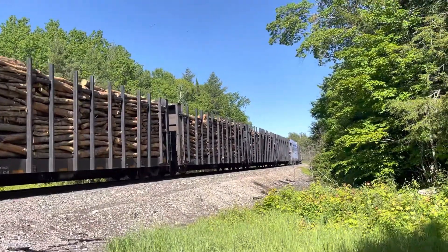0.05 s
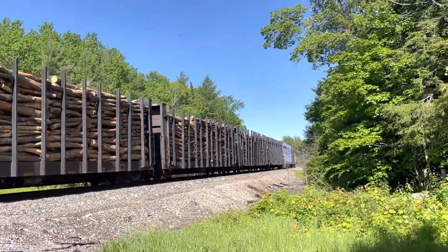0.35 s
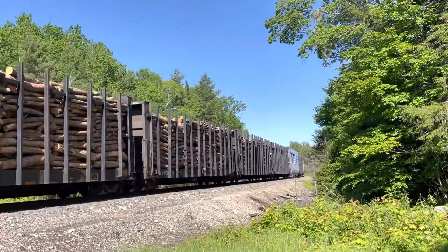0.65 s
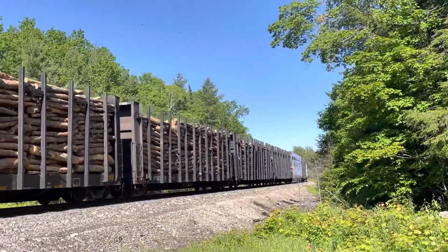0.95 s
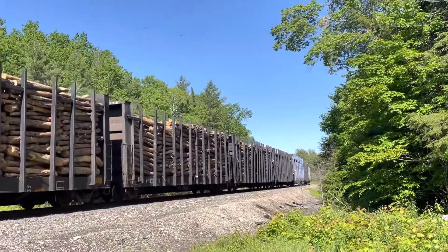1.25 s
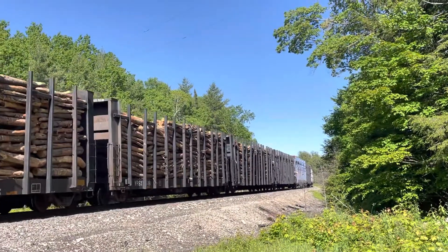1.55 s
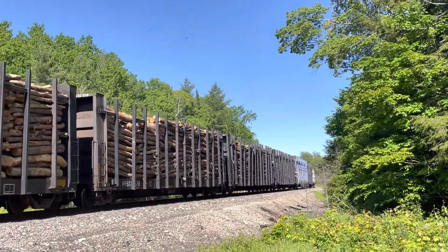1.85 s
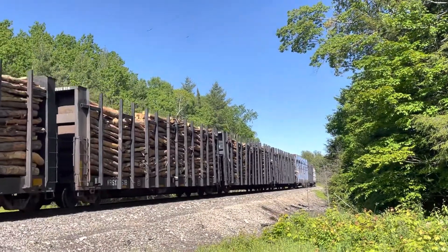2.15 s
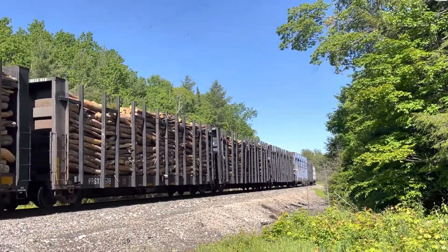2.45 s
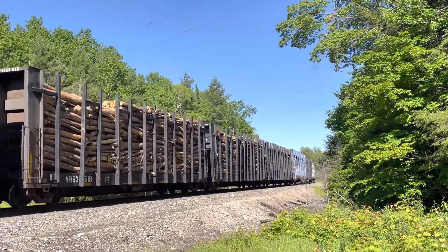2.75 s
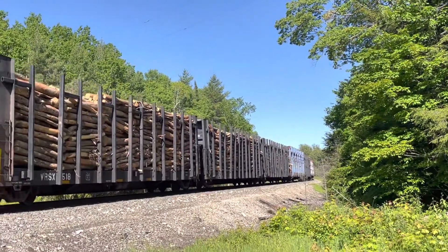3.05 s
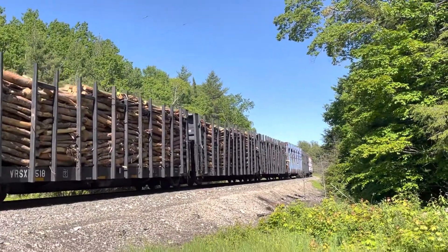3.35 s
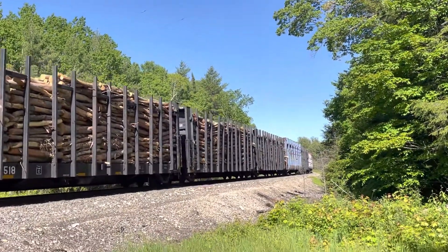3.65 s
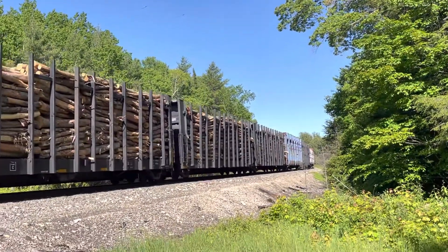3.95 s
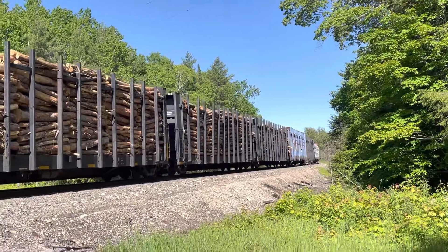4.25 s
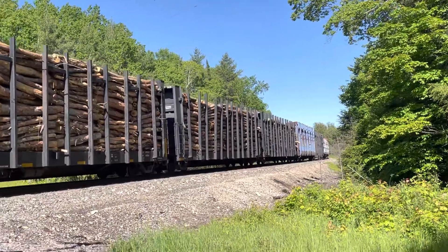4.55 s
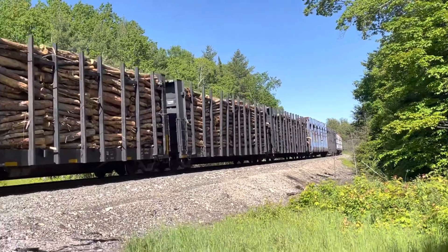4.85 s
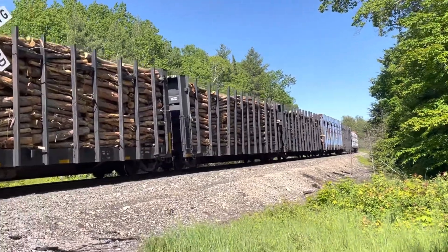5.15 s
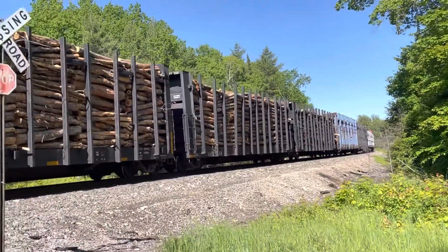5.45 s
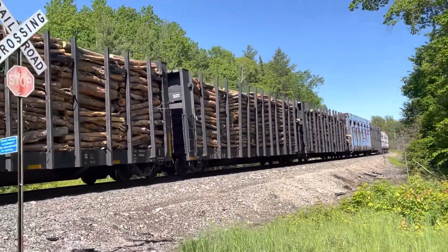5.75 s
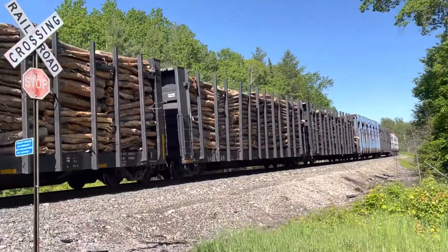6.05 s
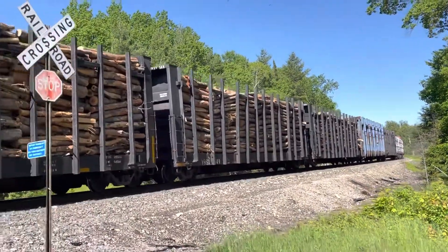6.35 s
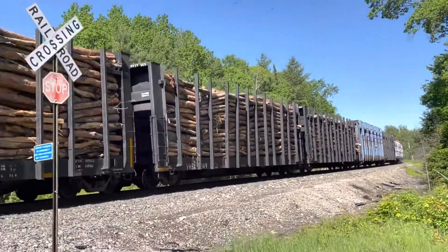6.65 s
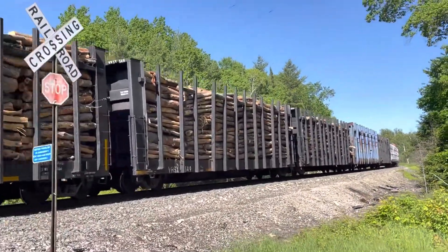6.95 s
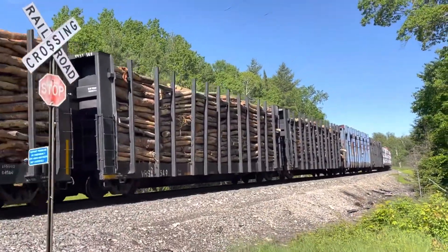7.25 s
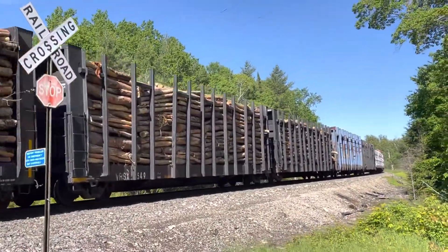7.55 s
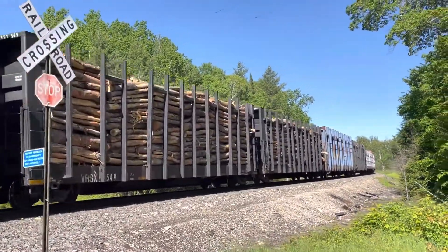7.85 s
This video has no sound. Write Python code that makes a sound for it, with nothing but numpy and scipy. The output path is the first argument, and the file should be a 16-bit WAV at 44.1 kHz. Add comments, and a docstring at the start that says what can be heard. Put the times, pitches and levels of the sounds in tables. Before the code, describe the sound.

A freight train of loaded log cars rolls slowly past, heard in stereo from beside the track. Throughout, a diesel engine throbs under a thin, faint whistle, while wheels rumble and hiss on the rails, gradually growing louder. Two dull knocks come in the first second. Light wheel scrapes and brief high squeals follow from about 0.5 to 3 seconds. Ringing steel clanks sound at about 3.3, 5 and 6 seconds, the middle one strongest and joined by grinding and squealing. From 3.7 seconds the loads knock and rattle more often, and the rolling swells as wheel sets pass at roughly 3.7, 4.9 and 6.6 seconds. Around 6.7 to 7.1 seconds the car bodies boom with a cluster of heavy knocks. From 7.3 seconds to the end, near 8 seconds, the wheels grind and squeal at their closest and loudest.

```python
"""Beside the track at an embankment, a stereo microphone hears loaded log cars roll slowly past.
From the start a diesel throbs under its turbocharger's thin whistle, and rough treads rumble on the rail.
Flanges grind in bursts, wheels sing briefly, loads knock and rattle. From about three seconds the slack
clanks through the cars and trucks swell by; near the end the bodies boom and the wheels grind closest."""
import sys
import numpy as np
from scipy import signal
from scipy.fft import irfft
from scipy.io import wavfile
from scipy.ndimage import uniform_filter1d

SR = 44100
rng = np.random.default_rng(int(sys.argv[2]) if len(sys.argv) > 2 else 0)


def put_to_file(sound):
    """Save the sound as 16-bit audio at rate SR, in the file named by the first command-line argument."""
    columns = np.atleast_2d(sound).T  # one column per channel
    safe = np.clip(columns, -1, 1)
    whole_steps = np.round(safe * 32767)
    wavfile.write(sys.argv[1], SR, whole_steps.astype(np.int16))


N = 352359
TIME = np.arange(N) / SR

# Speed of the diesel. Each row: time in seconds, firings per second.
FIRING_RATE = [(0, 42.8), (0.95, 42.85), (3.0, 45.7), (3.8, 46.37), (4.6, 46.37), (6.0, 45.7), (8.0, 45.75)]
# Roar of wheels and sleepers. Each row: frequency in Hz, spectral level in dB.
ROAR_TONE = [(120, -22.5), (280, -6), (420, 1), (530, -2.5), (650, -1.5), (850, -7.5), (1000, -10),
             (1300, -16), (1900, -29.5), (4000, -51), (9000, -79)]
# Phase between left and right. Each row: frequency in Hz, radians by which the left side leads.
LEFT_LEAD = [(80, .08), (300, .6), (500, 1.2), (680, 2), (950, 1.1), (1250, 1.6), (1850, -1.7), (2250, 0),
             (6450, 0), (6950, 3), (8000, 2.9), (9300, 1.5), (10000, 0), (12100, 0), (13500, -3)]
# Modes of the steel fittings on three cars. Each row: frequency in Hz, relative level in dB.
SMALL_FITTING = [(2030, -5), (2121, 0), (3273, -4), (3670, -1), (3795, -2), (3978, -2.5), (4180, -3.5),
                 (4480, -7), (4770, -4.5), (5520, -6), (6140, -8)]
HEAVY_FITTING = [(1690, -6), (2213, -3), (2449, 0), (4005, -4.5), (4409, -4), (4603, -10), (5292, -10),
                 (5650, -7), (6490, -11), (8376, -20), (10200, -26), (11120, -25)]
BRIGHT_FITTING = [(1976, -6), (2503, 0), (3634, -3), (3730, -9), (4468, -5), (4764, -3), (4890, -6),
                  (5033, -7), (6293, -9), (6440, -9), (11130, -25)]


def gain_of(db):
    """Decibels to amplitude."""
    return 10 ** (np.asarray(db) / 20)


def unit_rms(x):
    """Scales to rms 1."""
    return x / np.sqrt(np.mean(x ** 2) + 1e-30)


def at_hz(points, hz):
    """Reads a spectrum table on a log-frequency axis."""
    f, value = np.transpose(points)
    return np.interp(np.log(hz + 1), np.log(f + 1), value)


def follow(rows):
    """Every column of a curve table, sample by sample."""
    times, *columns = np.transpose(rows)
    return [np.interp(TIME, times, column) for column in columns]


def add(mix, start, sound):
    """Mixes a stereo sound in at a start in seconds."""
    part = mix[:, max(round(start * SR), 0):][:, :sound.shape[1]]
    part += sound[:, :part.shape[1]]


def stereo_spectra(gain, hz):
    """Noise spectra: wide in the mids, centred in most of the treble, out of phase near 7-9 kHz."""
    # Each row: frequency in Hz, likeness of the two sides from 0 to 1.
    likeness = [(60, 1), (130, .97), (250, .88), (500, .6), (1400, .42), (1800, .45), (2300, .96),
                (3400, .99), (3900, 1), (6300, 1), (6700, .85), (7200, .97), (8300, .9), (9500, .7),
                (10400, 1)]
    same = np.clip(at_hz(likeness, hz), 0, 1)
    a, b, c, d = rng.standard_normal((4,) + gain.shape)
    left = a + 1j * b
    right = (same * left + np.sqrt(1 - same ** 2) * (c + 1j * d)) * np.exp(-1j * at_hz(LEFT_LEAD, hz))
    return gain * np.array([left, right])


def burst(colour_db, size=65536):
    """Stereo noise of rms 1, coloured by a function of frequency."""
    hz = np.fft.rfftfreq(size, 1 / SR)
    return unit_rms(irfft(stereo_spectra(gain_of(colour_db(hz)), hz)))


def wobble(hz, size=N):
    """Slow random drift of rms 1, up to about hz."""
    f = np.fft.rfftfreq(2 ** 19, 1 / SR)[:4000]
    spectrum = rng.standard_normal(len(f)) + 1j * rng.standard_normal(len(f))
    coarse = irfft(spectrum / (1 + (f / hz) ** 2))
    return np.interp(np.arange(size), np.linspace(0, 2 ** 19, len(coarse)), unit_rms(coarse))


def wash(tone, patchy_db, flicker_db, size):
    """Continuous stereo noise with drifting patches and a flicker shared by all pitches."""
    hz = np.fft.rfftfreq(size, 1 / SR)
    frames = 4 * N // size + 5
    drift = uniform_filter1d(rng.standard_normal((frames, len(hz))), size=8, axis=0)
    patches = unit_rms(uniform_filter1d(drift, size=4, axis=1))
    field_db = at_hz(tone, hz) + patchy_db * patches + flicker_db * rng.standard_normal((frames, 1))
    spectra = stereo_spectra(gain_of(field_db), hz).swapaxes(1, 2)
    _, noise = signal.istft(spectra, nperseg=size, noverlap=size - size // 4)
    return unit_rms(noise[:, :N])


def whistle(hz, width_hz):
    """Narrow noise of rms 1 carried along a pitch curve."""
    pole = np.exp(-2 * np.pi * width_hz / SR)
    noise = rng.standard_normal(N) + 1j * rng.standard_normal(N)
    fuzz = signal.lfilter([1], np.poly([pole, pole]), noise)
    return unit_rms((np.exp(2j * np.pi * np.cumsum(hz) / SR) * fuzz).real)


def blow(t, t60):
    """Envelope of a heavy blow: a soft start, then a steady decay."""
    return (1 - np.exp(-(t / .004) ** 2)) * np.exp(-np.log(1000) * t / t60)


def nearness_db(share):
    """Level of a layer that follows, by this share, the wheels' approach to the microphone."""
    # Each row: time in seconds, level in dB against the closest point.
    approach = [(0, -10.5), (1, -8), (2.1, -9.5), (3.5, -7), (4.4, -3.5), (6.4, -2.5), (7.3, 0)]
    return share * follow(approach)[0]


def truck_swell_db(rise_s=0.087, fade_s=0.19):
    """Each truck crossing a rough stretch of rail lifts the noise: quick rise, hold, slow fade."""
    # Each row: start in seconds, hold in seconds, swell in dB.
    trucks = [(3.654, 0.27, 4.5), (4.887, 0.14, 4), (6.552, 0.33, 4.5), (7.76, 0.081, 3)]
    return sum(db * np.clip((TIME - start) / rise_s, 0, 1)
               * np.exp(-np.maximum(TIME - start - rise_s - hold, 0) / fade_s)
               for start, hold, db in trucks)


def diesel(throb_s=3.95, stagger_rad=0.037, scatter_rad=0.164):
    """Uneven cylinders put lines round the firing note, which beat into a throb."""
    # Each row: time in seconds, level in dB of the deep firing note, then of the upper lines.
    levels = [(0, -37.5, -27), (.4, -31.5, -26.5), (1.3, -35.5, -28), (2.6, -27.5, -25), (3.9, -24.5, -31),
              (4.7, -24.5, -25), (5.1, -27.5, -23), (5.5, -22.5, -26), (5.95, -27, -24.5),
              (6.7, -25, -20.5), (7.3, -23.5, -18.5), (7.9, -22, -19.5)]
    # Exhaust lines. Each row: multiple of the engine's cycle rate, relative level in dB.
    exhaust = [(7, -37), (8, 1), (9, -9.5), (10, -16.5), (11, -12.5), (12, -14.5), (13, -28), (14, -27),
               (15, -12), (16, -11.5), (17, -15), (18, -21), (19, -19.5), (20, -21), (24, -23)]
    cycles = np.cumsum(follow(FIRING_RATE)[0]) / SR / 8  # eight firings to a cycle
    cycles -= np.interp(throb_s, TIME, cycles)  # one throb falls here
    deep, upper = gain_of(follow(levels))
    out = np.zeros(N)
    for multiple, db in exhaust:
        apart = abs(multiple - 8)
        far = apart > 1
        # lines far from the firing note are scattered by the pipe and the passing cars
        lag = far * 2 * np.pi * rng.random() + (stagger_rad + scatter_rad * apart) * wobble(2.1)
        out += gain_of(db) * (upper if far else deep) * np.cos(2 * np.pi * multiple * cycles - lag)
    return out * gain_of(.7 * wobble(6)) * gain_of([[-.75], [.75]])  # a little to the right


def turbocharger(waver_hz=15, flutter_db=1.4):
    """A fuzzy whistle sags and recovers with the engine's load, over a faint whine of gears."""
    # Each row: time in seconds, pitch of the whistle in Hz.
    pitch = [(0.05, 5130), (1.17, 4770), (2.3, 4950), (3.28, 5080), (4.2, 5130), (5.8, 5030)]
    # Each row: time in seconds, level of the whistle in dB, gain of the gears in dB.
    levels = [(.1, -62, -13), (.7, -63, -3), (1.2, -60, -1), (2.15, -62.5, -3), (2.5, -61, -2.5),
              (3.2, -61, -2), (3.7, -60, -1), (4.1, -58.5, 3), (5.3, -59.5, -2), (6.0, -57, -3),
              (6.15, -61, 4), (6.37, -60, 0), (6.5, -56.5, -1), (7.2, -58, 5), (7.5, -65, 0)]
    # Each row: multiple of the firing rate, level in dB.
    gears = [(19.7, -63.5), (61.0, -67.5), (71, -82)]
    whistle_db, gears_db = follow(levels)
    firing_hz = follow(FIRING_RATE)[0]
    whine = sum(gain_of(db) * whistle(multiple * firing_hz, width_hz=16.5) for multiple, db in gears)
    turbine = whistle(follow(pitch)[0] + waver_hz * wobble(9.03), width_hz=73)
    return whine * gain_of(gears_db) + turbine * gain_of(whistle_db + flutter_db * wobble(9))


def rail_sizzle(flutter_db=1.0):
    """The highest hiss of steel rolling on steel comes and goes with the wheel sets."""
    # Each row: frequency in Hz, spectral level in dB.
    tone = [(5000, -22), (7500, -7), (8500, 3), (9400, -1), (11200, -6.5), (12500, -13.5), (15000, -30)]
    # Each row: time in seconds, level in dB.
    level = [(.1, -78.5), (.85, -81.5), (1.4, -74.5), (2.7, -76.5), (3.2, -73.5), (3.7, -76.5), (4.65, -80),
             (4.9, -75), (5.95, -76), (6.7, -70.5), (6.95, -72), (7.25, -69), (7.65, -63), (7.95, -71)]
    noise = wash(tone, patchy_db=3.0, flicker_db=1.0, size=2048)
    return noise * gain_of(follow(level)[0] + flutter_db * wobble(9))


def load_rattle(bumps_per_s=1.6, level_db=-48, t60=0.23, parts=24, tries=40):
    """Stakes, logs and brake rigging bump at random on dull notes, louder as the wheels come near."""
    t, out = TIME[:SR // 2], np.zeros((2, N))
    for hz in np.geomspace(280, 1150, parts) * rng.uniform(0.94, 1.04, parts):
        lag = np.array([[0], [at_hz(LEFT_LEAD, hz)]])
        ring = gain_of(at_hz(ROAR_TONE, hz)) * blow(t, t60) * np.sin(2 * np.pi * hz * t - lag)
        for when, chance, force in rng.random((tries, 3)):
            if chance < bumps_per_s * TIME[-1] / tries:
                add(out, when * TIME[-1], force * ring)
    return unit_rms(out) * gain_of(level_db + nearness_db(1.07) + truck_swell_db())


def body_boom(lumps_db=2.0):
    """The loaded car bodies boom in uneven lumps, most when a truck rolls close by the microphone."""
    # Each row: frequency in Hz, spectral level in dB.
    tone = [(110, -27), (180, 1), (235, -3), (285, 0.5), (370, -12.5), (520, -23.5), (1200, -60.5)]
    # Each row: time in seconds, level in dB.
    level = [(0, -48.5), (1.8, -49), (2.2, -56.5), (3.6, -54), (4.3, -46), (4.9, -44.5), (5.4, -45),
             (6.55, -45), (6.75, -35.5), (7.1, -38.5), (7.4, -46)]
    noise = wash(tone, patchy_db=2.5, flicker_db=.5, size=4096)
    return noise * gain_of(follow(level)[0] + lumps_db * wobble(11))


def rolling(rumble_db=-32, roar_db=-37, hiss_db=-48.5):
    """Rough treads shake the car bodies, roar in wheels and sleepers, and hiss along the rail."""
    # Each row of both: frequency in Hz, spectral level in dB.
    rumble_tone = [(15, -30), (30, -22), (42, 3), (65, 6), (95, 5.5), (125, -1), (160, -0.5), (200, -0.5),
                   (300, -8), (430, -16.5), (800, -30), (2000, -64)]
    hiss_tone = [(500, -12), (1200, -7.5), (1850, 4), (2200, 0.5), (2800, -1.5), (3200, -5), (4200, -8),
                 (5700, -10.5), (6600, -17), (7400, -17), (9300, -28), (15000, -52)]
    rumble = wash(rumble_tone, patchy_db=2.0, flicker_db=.5, size=4096)
    rumble *= gain_of(rumble_db + nearness_db(0.92) + 0.37 * truck_swell_db())
    roar = wash(ROAR_TONE, patchy_db=1.36, flicker_db=0.1, size=1024)
    roar *= gain_of(roar_db + nearness_db(1.22) + truck_swell_db())
    hiss = wash(hiss_tone, patchy_db=2.5, flicker_db=0.8, size=2048)
    hiss *= gain_of(hiss_db + nearness_db(0.88))
    return rumble + roar * gain_of([[1], [-1]]) + hiss  # the wheels pass on the left


def frame_knock(db, pitch_hz, t60, clatter_db):
    """A dull note of the car frame, with a short clatter of the truck on top."""
    clatter = burst(lambda hz: at_hz(ROAR_TONE, hz))
    t = TIME[:clatter.shape[1]]
    frame = np.sin(2 * np.pi * pitch_hz * t) * blow(t, t60)
    return gain_of(db) * (frame + gain_of(clatter_db) * clatter * blow(t, 1.5 * t60))


def slack_clank(db, t60, modes, rise_s=.014, split_hz=9, neighbour_db=-6):
    """Slack bumps steel on steel: each mode has two weaker neighbours, so the ring beats as it dies."""
    t, out = TIME[:SR], np.zeros((2, SR))
    for hz, mode_db in modes:
        lag = np.array([[0], [at_hz(LEFT_LEAD, hz)]])
        for is_neighbour in (False, True, True):
            pitch_hz = hz + is_neighbour * split_hz * rng.standard_normal()
            phase = 2 * np.pi * (pitch_hz * t + rng.random())
            out += gain_of(mode_db + is_neighbour * neighbour_db) * np.sin(phase - lag)
    return gain_of(db) * out * np.minimum(t / rise_s, 1) * blow(t, t60)


def wheel_squeal(length, pitch_hz, db, width_hz, slide_hz_per_s, rise_s=0.015, lift_db=3, fade_db=-4):
    """Friction feeds one wheel mode: an unsteady note that catches quickly, may slide, and dies away."""
    band = burst(lambda hz: -20 * np.log10(1 + (2 * (hz - pitch_hz) / width_hz) ** 2), size=32768)
    analytic = signal.hilbert(band)[:, :int(length * SR)]
    t = TIME[:analytic.shape[1]]
    note = (analytic * np.exp(1j * np.pi * slide_hz_per_s * t ** 2)).real
    note *= gain_of(wobble(15, size=len(t)))  # a stutter of about 1 dB
    progress = t / t[-1]
    envelope = np.minimum(t / rise_s, 1) * (1 - progress ** 2)
    return gain_of(db + lift_db + fade_db * progress) * unit_rms(note) * envelope


def flange_scrape(rise, hold, t60, db, tilt_db, focus_hz, ripple_db, chatter_db=1.26, ring_db=-9):
    """A flange bites the rail and lets go; the wheel's sharp resonances ring on after the grinding."""
    # Each row: frequency in Hz, spectral level in dB.
    grind_tone = [(400, -16), (1150, 3), (1600, -2.5), (2300, 1), (3200, -2), (4200, -3), (5700, -3.5),
                  (6400, -8), (7200, -13.5), (9000, -21), (11000, -23.5), (13000, -30), (15500, -32)]
    # Each row: frequency in Hz, width in Hz, strength of the resonance.
    wheel_modes = [(1850, 150, 2.5), (2210, 60, 3), (2390, 80, 1.5), (2510, 100, 3.5), (2830, 160, 1),
                   (3410, 77, 3), (3630, 45, 4), (3970, 100, 2), (4220, 70, 3.5), (4425, 57, 5.5),
                   (4760, 60, 1.5), (5370, 80, 1.5), (5590, 82, 2), (6160, 77, 4.5), (6490, 76, 5),
                   (7780, 130, 13), (8390, 180, 13), (9200, 120, 10), (10400, 250, 1), (10600, 100, 5),
                   (11100, 220, 9.5), (12100, 250, 6), (13280, 220, 12)]

    def resonance(hz):
        return sum(peak / (1 + (2 * (hz - f) / width) ** 2) for f, width, peak in wheel_modes)

    def grind_db(hz):
        # many small modes of rail and truck
        ripple = ripple_db * unit_rms(uniform_filter1d(rng.standard_normal(len(hz)), size=50))
        focus = 5 * np.exp(-(np.log2((hz + 1) / focus_hz) / 0.58) ** 2)  # a broad 5 dB hump
        tilt = tilt_db * np.log2(np.maximum(hz, 1000) / 1000)
        return at_hz(grind_tone, hz) + ripple + focus + tilt

    grind = burst(lambda hz: grind_db(hz) + .5 * resonance(hz))
    ring = burst(lambda hz: grind_db(hz) + 20 * np.log10(resonance(hz)))
    t = TIME[:grind.shape[1]]
    fall_db = -60 * np.maximum(t - rise - hold, 0) / t60
    grind *= gain_of(fall_db + chatter_db * wobble(25, size=len(t)))
    ring *= gain_of(ring_db + fall_db / 1.15)
    return (grind + ring) * np.minimum(t / rise, 1) * gain_of(db)


def scene():
    """Engine, rolling cars and their small events in the open air beside the track."""
    # Each row: start in seconds, level in dB, pitch in Hz, t60 in seconds, clatter in dB against the note.
    knocks = [(.17, -29.5, 211.5, 0.3, -17), (.545, -32, 281, 0.45, -14), (3.67, -38, 290, 0.4, -6),
              (3.86, -36.5, 643, 0.39, -4), (3.98, -32.5, 424.6, 0.44, -10),
              (4.21, -30.5, 174.6, 0.43, -14), (4.44, -32.5, 181, 0.71, -17), (4.8, -35, 343, 0.33, -9),
              (5.005, -30, 337, 0.33, -10), (5.23, -39, 636, 0.5, -6), (5.338, -27.5, 547, 0.056, -1),
              (5.42, -39, 400, 0.31, -2), (5.66, -33, 289, 0.38, -8), (5.82, -36, 248, 0.41, -3),
              (6.38, -36, 230, 0.3, -14), (6.585, -38, 404, .4, 2), (6.667, -27.5, 446, 0.2, -10),
              (6.742, -29, 377, 0.2, -12), (6.833, -26, 225, 0.23, -10), (6.98, -33, 208, 0.19, -6),
              (7.102, -31.5, 284, 0.22, -5), (7.53, -30, 446, 0.43, -1.5), (7.85, -30.5, 239.4, 0.28, -5)]
    # Each row: start in seconds, level in dB, t60 in seconds, the fitting struck.
    clanks = [(3.335, -56.5, 0.67, SMALL_FITTING), (4.956, -48.5, 1, HEAVY_FITTING),
              (6.066, -51, 1.1, BRIGHT_FITTING)]
    # Each row: start and length in seconds, pitch in Hz, level in dB, width in Hz, slide in Hz a second.
    squeals = [(.515, .32, 4000, -63.5, 94, 0), (.56, .25, 1200, -59, 300, 2),
               (1.3, 0.33, 2100, -62, 660, 0), (1.3, .45, 2400, -69, 35, 3), (1.15, .42, 875, -58, 70, 0),
               (1.202, .24, 2900, -75, 50, 0), (1.195, .4, 4420, -70, 130, 0),
               (1.32, .25, 3720, -67.5, 70, 0), (1.38, .25, 2660, -64.5, 35, 0),
               (1.64, .3, 3130, -73, 30, 0), (1.63, 0.34, 2670, -68, 30, 2), (1.96, .3, 2680, -67, 30, -2),
               (1.96, .18, 3140, -71, 30, 0), (2.362, .28, 6080, -69, 200, 1100),
               (2.36, .2, 1260, -60, 70, 0), (2.82, .09, 1290, -58, 160, 0),
               (3.355, .07, 3700, -60, 260, 0), (3.34, .15, 2150, -65, 130, 0),
               (4.41, .16, 2495, -54, 50, 0), (4.8, .15, 1265, -57, 70, 0), (4.43, .14, 4760, -59, 140, 0),
               (4.952, .36, 2150, -52, 190, 2), (5.045, 0.23, 2450, -49.5, 110, -500),
               (5.03, .36, 3980, -57, 220, -220), (5.17, 0.38, 1740, -54.5, 170, 0),
               (6.299, 0.28, 2050, -57, 90, 0), (6.529, 0.21, 3214, -56.5, 60, -400),
               (7.039, 0.21, 975, -46, 50, 0), (7.2, 0.42, 1070, -46, 150, 100),
               (7.339, 0.22, 950, -43, 44, -2), (7.46, .28, 4400, -59, 70, 0),
               (7.66, .5, 4420, -54.5, 100, 0), (7.6, .5, 3000, -58.5, 60, 0),
               (7.619, 0.31, 2820, -50, 350, 0), (7.7, .35, 2700, -56, 50, 2),
               (7.35, .4, 2350, -53, 900, 0), (7.47, .6, 6500, -59.5, 450, 0),
               (7.76, 0.4, 845, -43.5, 130, 3)]
    # Each row: start, rise, hold and t60 in seconds, level in dB, treble tilt in dB an octave,
    # frequency in Hz round which the wheel rings most, depth of the spectral ripple in dB.
    scrapes = [(.528, .024, .17, 0.65, -57, -4.5, 4000, 3), (0.932, .13, .04, 0.72, -62, 6, 10000, 6),
               (1.157, .04, 0.29, .5, -58.5, -2.5, 4420, 4), (2.325, 0.05, 0.066, 1, -53.5, -3, 5700, 4),
               (3.32, 0.039, .035, 0.55, -54, 1.5, 4300, 4.5), (3.764, .028, .04, 0.65, -52, -0.5, 8750, 2),
               (3.8, .09, 0.59, .35, -52, -3, 4950, 3.5), (4.419, .029, .07, .3, -55.5, -1.5, 4200, 3),
               (4.774, .024, .09, .6, -60, 0, 7500, 5), (4.95, .014, 0.076, .7, -47, 1, 5700, 3.5),
               (4.959, .04, 0.22, 0.82, -47, 0, 2290, 4.5), (5.486, .026, .015, .7, -50.5, -6, 6000, 3),
               (5.689, .05, .02, .4, -56, 1, 11000, 2), (6.056, .014, .035, 0.69, -47.5, .5, 5500, 3.5),
               (6.153, .05, 0.18, 0.69, -53, 1, 2800, 5), (6.531, 0.057, 0.055, 0.9, -53.5, -0.5, 7000, 4),
               (7.003, .02, .04, 0.93, -51, -7, 3500, -1), (7.176, 0.031, .04, .5, -46.5, -4, 7500, 1.5),
               (7.325, 0.031, 0.55, .9, -42, -3.5, 1580, 3), (7.35, 0.17, 0.39, 0.78, -47, 2, 2500, 4.5)]
    mix = diesel() + turbocharger() + rolling() + rail_sizzle() + body_boom() + load_rattle()
    for source, events in ((flange_scrape, scrapes), (wheel_squeal, squeals),
                           (slack_clank, clanks), (frame_knock, knocks)):
        for start, *settings in events:
            add(mix, start, source(*settings))
    return mix


def record(dry, edge_hz=15760):
    """The band limit of the recorder, with soft ends."""
    faded = dry * signal.windows.tukey(N, .001)
    lowpass = signal.firwin(511, edge_hz, window=("kaiser", 9), fs=SR)
    return signal.oaconvolve(faded, lowpass[None], "same")


dry = scene()
out = record(dry)
put_to_file(out)
```